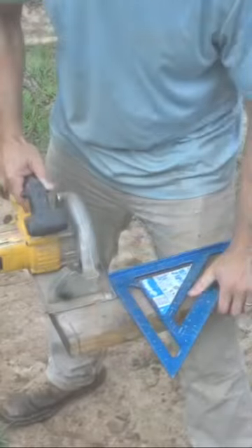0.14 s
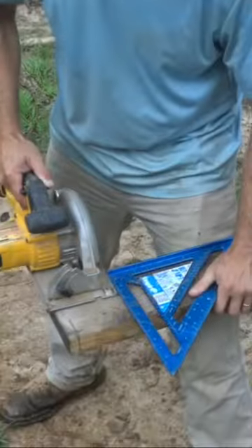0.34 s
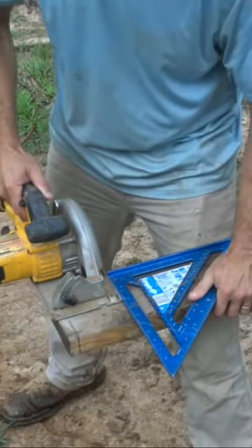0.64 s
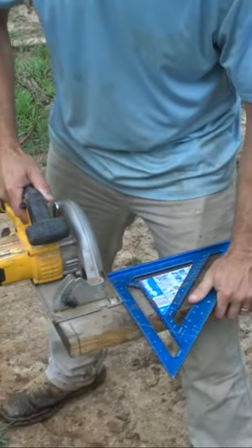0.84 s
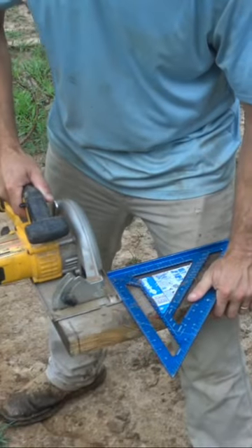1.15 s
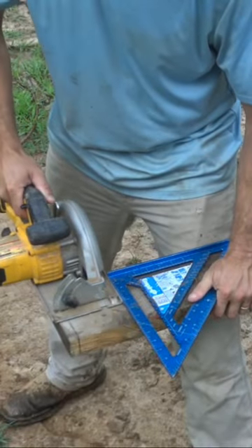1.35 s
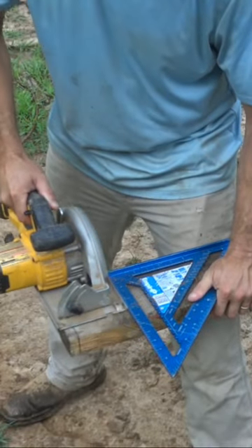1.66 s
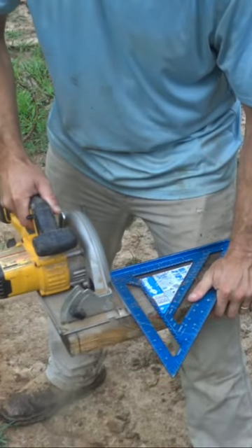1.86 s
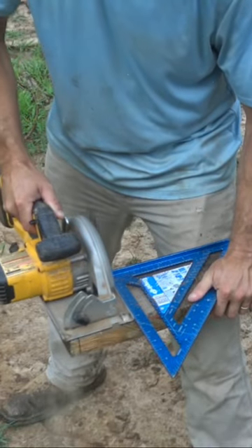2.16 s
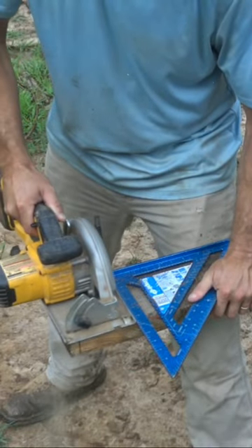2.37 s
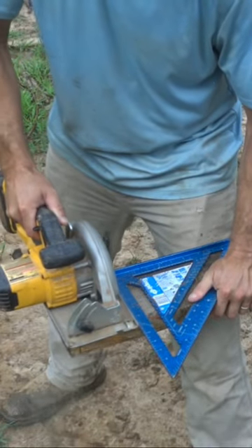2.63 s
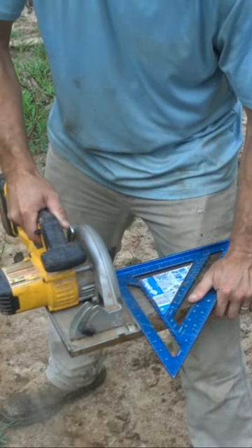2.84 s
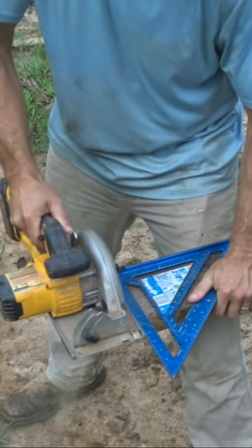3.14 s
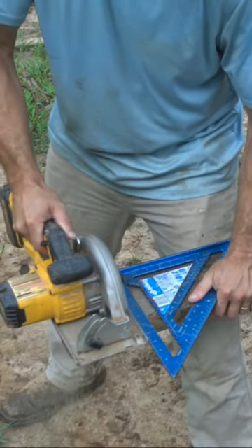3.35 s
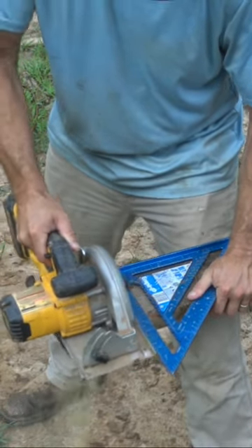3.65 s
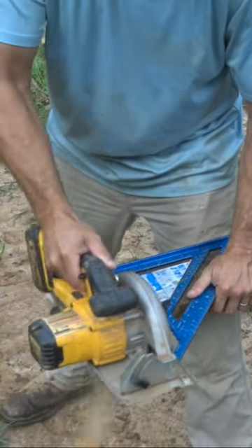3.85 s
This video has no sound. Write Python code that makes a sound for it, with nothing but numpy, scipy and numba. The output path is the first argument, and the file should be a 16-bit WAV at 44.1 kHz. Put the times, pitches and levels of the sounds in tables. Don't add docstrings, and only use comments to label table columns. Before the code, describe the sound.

Over a quiet insect hum outdoors, a close circular saw scuffs wood, its trigger snaps, its motor whines up into a loud gritty roar, labours, speeds up free, then clicks off with a sharp wooden knock.

```python
import sys
import numpy as np
from scipy import signal
from scipy.fft import rfft, irfft
from scipy.io import wavfile
from scipy.ndimage import uniform_filter1d, map_coordinates
from numba import njit

SR = 44100
rng = np.random.default_rng(int(sys.argv[2]) if len(sys.argv) > 2 else 0)


def voltage_ratio(decibels):
    exponent = np.asarray(decibels, float) / 20
    return 10 ** exponent


def unload_wav(signal):
    wavfile.write(
        sys.argv[1],
        SR,
        np.round(np.clip(np.atleast_2d(signal).T, -1, 1) * 32767).astype(np.int16),
    )


N = 176400
GEAR_TEETH, PINION_TEETH = 46, 9


def unit(x):
    return x / np.sqrt(np.mean(x ** 2))


def colour(x, table, share=1):
    hz, db = np.array(table, float).T
    f = np.maximum(np.fft.rfftfreq(N, 1 / SR), 1)
    gain_db = np.interp(np.log(f), np.log(np.maximum(hz, 1)), db)
    return irfft(rfft(x) * voltage_ratio(share * gain_db), N)


def band(x, hz, width):
    return signal.lfilter(*signal.iirpeak(hz, hz / width, SR), x)


def narrow(x, hz, width):
    return unit(band(band(x, hz, width), hz, width))


@njit
def sweep(x, hz, q):
    y, b, l = np.empty(len(x)), 0., 0.
    for i in range(len(x)):
        g = np.tan(np.pi * hz[i] / SR)
        v = (b + g * (x[i] - l)) / (1 + g * (g + 1 / q))
        b, l, y[i] = 2 * v - b, l + 2 * g * v, v
    return y


def butter(x, order, hz, kind):
    return signal.sosfilt(signal.butter(order, hz, kind, fs=SR, output="sos"), x)


def walk(rate):
    hold = int(SR / rate)
    steps = np.repeat(rng.standard_normal(N // hold + 1), hold)
    return 0.93 * uniform_filter1d(uniform_filter1d(steps, hold), hold)[:N]


def curves(table, t):
    at, *columns = np.array(table, float).T
    return (np.interp(t, at, c) for c in columns)


def bursts(events, source, t):
    out = 0
    for at, length, hz, width, db in events:
        swell = np.sin(np.pi * np.clip((t - at) / length, 0, 1)).clip(0)
        out = out + voltage_ratio(db) * swell * narrow(source, hz, width)
    return out


def hits(events, modes, rattle_s, soft_s):
    size, crack_db = 4096, 1.5
    out, t = np.zeros(N), np.arange(size) / SR
    ring = sum(voltage_ratio(g) * np.sin(2 * np.pi * hz * t) * 1000 ** (-t / t60) for hz, g, t60 in modes)
    for at, db in events:
        push = rng.standard_normal(size) * np.exp(-t / rattle_s)
        push = signal.lfilter([1], [1, -np.exp(-1 / (SR * soft_s))], push)
        blow = unit(signal.fftconvolve(push, ring)[:size]) + voltage_ratio(crack_db) * unit(push)
        i = int(at * SR)
        out[i:i + size] += (voltage_ratio(db) * blow / np.abs(blow).max())[:N - i]
    return out


def yard():
    # f/Hz, width/Hz, level/dB
    insects = [(4868, 400, -38), (6760, 1300, -63), (8340, 830, -63), (9670, 990, -60.5), (3250, 900, -91)]
    # t/s, length/s, f/Hz, width/Hz, level/dB
    flares = [(.733, 0.0091, 4930, 400, -32.5), (.982, .01, 4760, 400, -35), (1.061, .009, 4900, 500, -32)]
    # f/Hz, level/dB per Hz
    rumble = [(18, -47), (30, -32), (69, -0.5), (336, -5.5), (1100, -7), (1590, -15), (1730, -11.5),
              (3470, -15.5), (4000, -80.5), (5200, -49), (8800, -120)]
    left = np.array([[1], [-1]])

    def noise(wide):
        return rng.standard_normal(N) + wide * left * rng.standard_normal(N)

    wing_hz = 36 * (1 + 0.022 * walk(5.4))
    pulse = np.sin(2 * np.pi * np.cumsum(wing_hz) / SR)
    bugs = bursts(flares, noise(0), np.arange(N) / SR)
    for hz, width, db in insects:
        pulse_db = 0.3 * hz / 1000
        bugs = bugs + voltage_ratio(db) * narrow(noise(0.033) * voltage_ratio(1.2 * walk(88.2) + pulse_db * pulse), hz, width)
    pan_db = 5.5
    wind = voltage_ratio(-71) * narrow(noise(0.62), 63, 80)
    air = voltage_ratio(-61.5) * noise(0.073)
    return bugs * voltage_ratio(left * pan_db / 2) + voltage_ratio(-58.5) * unit(colour(noise(0.19), rumble)) + air + wind


def shoe_on_board(t):
    # t/s, peak level/dB
    taps = [(0.406, -37.5), (0.44, -32), (0.469, -39), (0.501, -35), (0.528, -41), (0.561, -44),
            (0.601, -39), (0.639, -37), (0.673, -38), (0.705, -40)]
    # f/Hz, level/dB, T60/s
    shoe = [(284, -14, .06), (612, 7, 0.057), (1000, -13, 0.027), (1520, 3, 0.044), (2030, -8, 0.087),
            (3200, -2, 0.048)]
    # t/s, length/s, f/Hz, width/Hz, level/dB
    scuffs = [(.58, .05, 2023, 80, -56), (.53, .13, 3150, 800, -57), (.855, .03, 3200, 400, -57),
              (.91, 0.067, 3050, 500, -63), (.98, .06, 2900, 500, -60), (1.04, .03, 2300, 900, -60),
              (1.068, 0.0082, 1690, 1400, -37), (1.075, 0.018, 1700, 1600, -45)]
    return hits(taps, shoe, 0.005, 0.00024) + bursts(scuffs, rng.standard_normal(N), t)


def trigger_clicks():
    # t/s, peak level/dB
    snaps = [
        (1.092, -7.5),
        (1.094, -12.5),
        (1.0985, -21),
        (1.1448, -8),
        (1.148, -5.5),
        (3.905, -4),
    ]
    # f/Hz, level/dB, T60/s
    trigger = [(970, -14, .015), (1400, -1, 0.032), (1790, 7, 0.026), (2760, 5.5, 0.009), (3580, 0, 0.0071),
               (5900, 5, 0.005), (8240, 7, 0.004), (11000, -4, 0.0025)]
    return butter(hits(snaps, trigger, 0.002, 0.00003), 2, [640, 10000], "band")


def board_knocks():
    # t/s, peak level/dB
    knocks = [
        (1.71, -37),
        (2.478, -39),
        (3.975, -11),
        (3.9772, -14),
        (3.98, -0.5),
    ]
    # f/Hz, level/dB, T60/s
    board = [(177, -20, 0.065), (310, -6, 0.049), (595, -8, 0.015), (820, 8, 0.034), (1140, 2, 0.024),
             (1600, -1, .015), (2940, -8, .006)]
    return butter(hits(knocks, board, 0.000276, 0.00014), 3, 90, "high")


def controller_chirp(t):
    start_s, length_s = 1.152, 0.079
    return voltage_ratio(-33.5) * np.sin(2 * np.pi * 3970 * t) * (t > start_s) * (t < start_s + length_s)


def tooth_contacts(turns, share):
    steps_per_turn, memory, chip_db = 640, 0.87, 1.5
    rows = rng.standard_normal((200, steps_per_turn))
    rows = signal.lfilter([1], [1, -memory], rows, axis=0)[9:].ravel()
    repeat = unit(map_coordinates(rows, [turns * steps_per_turn]))
    chips = unit(rng.standard_normal(N) * voltage_ratio(chip_db * rng.standard_normal(N)))
    return np.sqrt(share) * repeat + np.sqrt(1 - share) * chips


def gears(t, turns, grind):
    # t/s, gear mesh level/dB, its octave level/dB, motor shaft hum level/dB
    whine_levels = [(1.16, -40, -46, -60), (1.22, -23, -31, -55), (1.31, -19, -42, -46),
                    (1.385, -29, -26, -41), (1.52, -32, -30, -45), (1.7, -35, -38, -49),
                    (1.86, -32, -40, -50), (2.1, -40, -36, -55), (2.35, -29, -38, -49),
                    (2.75, -36, -38, -45), (3.05, -29, -30, -56), (3.18, -23, -25, -54),
                    (3.34, -31, -42, -52), (3.47, -19, -29, -52), (3.58, -42, -36, -52),
                    (3.68, -26, -42, -45), (3.85, -36, -34, -41), (3.92, -19, -33, -56)]
    # multiple of the shaft rate, level/dB re hum
    shaft_tones = [(1, 0), (3, 6)]
    housing_hz = [900, 1250, 1720, 2150, 2330, 2560, 3090]
    mesh_db, octave_db, hum_db = curves(whine_levels, t)
    shaft = 2 * np.pi * turns * GEAR_TEETH / PINION_TEETH

    def tone(k, db):
        level = voltage_ratio(db + 2 * walk(22) + 2.5 * grind * walk(130))
        return level * np.sin(k * shaft + (0.2 + 1.4 * grind) * walk(250))

    wobble = 1 + 0.12 * np.sin(2 * np.pi * turns) + 0.24 * np.sin(shaft)
    mesh = wobble * tone(PINION_TEETH, mesh_db + 3.5)
    housing = sum(band(mesh, hz, 160) for hz in housing_hz)
    octave = wobble * tone(2 * PINION_TEETH, octave_db + 2.0)
    hum = sum(tone(k, hum_db + db + 5.0) for k, db in shaft_tones)
    return voltage_ratio(-4) * mesh + voltage_ratio(-4) * housing + octave + hum


def blade_song(t, turns):
    # t/s, length/s, multiple of the blade turn, level/dB
    songs = [(1.5, .25, 3, -54), (1.9, .25, 104, -29), (2.25, .2, 74, -28), (2.38, .14, 72, -26),
             (2.45, .4, 78, -23), (2.57, .22, 70, -33), (2.78, .38, 3, -52), (3.2, .25, 6, -44),
             (3.3, .1, 40, -24), (3.36, .09, 80, -28), (3.81, .11, 15.33, -25), (3.86, .04, 40.9, -25),
             (3.81, .12, 89, -29), (3.49, .06, 46, -24), (3.5, .09, 92, -26)]
    out = 0
    for at, length, k, db in songs:
        swell = np.sqrt(np.sin(np.pi * np.clip((t - at) / length, 0, 1)).clip(0))
        out = out + voltage_ratio(db + 3 + 1.2 * walk(25)) * swell * np.sin(2 * np.pi * k * turns + 0.2 * walk(150))
    return out


def cutting(t, contacts, rasp_db, roar_db, fizz_db):
    # f/Hz, width/Hz, level/dB
    blade_rings = [(930, 110, 3), (1700, 200, -2), (6800, 200, -6), (8740, 250, -6), (11450, 400, -6)]
    # t/s, f/Hz, level/dB re rasp
    kerf = [(1.4, 6600, -4), (1.6, 7360, -6), (2.1, 5700, -6.5), (2.5, 5300, -6.5), (3.0, 4040, -8),
            (3.35, 2010, -4.5), (3.6, 2360, -10), (3.8, 3470, -10.5)]
    # f/Hz, level/dB per Hz
    rasp_shape = [(1500, -34), (2500, -24), (3200, -5), (4500, -2.5), (6000, 3), (9000, 0.5), (12000, -8.5),
                  (15600, -27)]
    # f/Hz, level/dB per Hz
    roar_shape = [(59, -73), (100, -23), (304, -22.5), (780, -21.5), (895, -5.5), (1580, -3), (1910, -5.5),
                  (2480, -5.5), (4000, -12), (5200, -17), (8800, -120)]
    # f/Hz, level/dB per Hz
    fizz_shape = [(8000, -22), (10500, -1.5), (12500, -0.5), (14500, -4), (15700, -6.5)]
    rings = 0
    for hz, width, db in blade_rings:
        rings = rings + voltage_ratio(db + 2.1 * walk(3.99)) * band(contacts, hz, width) * np.sqrt(hz / width)
    teeth = contacts + voltage_ratio(-13) * unit(rings)
    kerf_hz, kerf_db = curves(kerf, t)
    slot = unit(sweep(contacts, kerf_hz, 4.0))
    rasp = unit(colour(teeth, rasp_shape)) + voltage_ratio(kerf_db) * slot
    roar = unit(colour(teeth, roar_shape))
    fizz = unit(colour(teeth, fizz_shape))
    return (rasp * voltage_ratio(rasp_db - 4.0 + 0.11 * walk(18)) + roar * voltage_ratio(roar_db + walk(9.63))
            + fizz * voltage_ratio(fizz_db + 0.27 * walk(10.1)))


def saw(t):
    # t/s, gear mesh f/Hz
    speed = [(1.15, 300), (1.36, 2658), (1.44, 3309), (1.52, 3465), (1.63, 3402), (1.81, 3124),
             (1.99, 3004), (2.23, 2997), (2.35, 3108), (2.59, 3009), (2.77, 2986), (3.07, 2734),
             (3.25, 2314), (3.49, 2562), (3.58, 2600), (3.76, 3400), (3.9, 3680), (4.0, 1050)]
    # t/s, rasp level/dB, board roar level/dB, fizz level/dB, share repeating each turn/0-1
    effort = [(1.16, -35, -29.5, -56, 0.3), (1.22, -26, -25, -38, 0.05), (1.3, -18.5, -19, -32, 0.27),
              (1.42, -20, -21, -21, 0.34), (1.6, -17, -27, -20.5, 0.78), (2.1, -18, -24.5, -21.5, 0.7),
              (2.9, -16, -25, -24, 0.89), (3.2, -16.5, -23.5, -24.5, 0.55), (3.36, -15.5, -20.5, -29, 0.65),
              (3.6, -15, -20.5, -29, 0.4), (3.8, -13, -22.5, -26.5, 0.32), (3.9, -17.5, -19.5, -63, 0.03),
              (4.0, -34, -28, -40, 0.2)]
    # t/s, length/s, f/Hz, width/Hz, level/dB
    jolts = [(1.21, .03, 2200, 540, -26), (1.28, 0.021, 5000, 270, -24), (1.4, 0.042, 1540, 150, -23),
             (1.335, 0.021, 3100, 600, -20), (1.6, 0.051, 1500, 120, -27), (1.25, 0.036, 510, 110, -33),
             (2.84, .1, 5600, 280, -24), (3.535, 0.041, 1560, 200, -20.5), (3.55, 0.043, 2000, 290, -25),
             (3.59, 0.038, 4400, 460, -26.5), (3.595, 0.023, 3100, 2500, -21),
             (3.59, 0.082, 920, 170, -26.5), (3.4, .03, 4900, 1100, -18), (3.8, 0.03, 11300, 500, -28),
             (2.9, .06, 8800, 300, -23)]
    start_s = speed[0][0]
    mesh_hz = np.interp(t, *np.array(speed).T)
    turns = np.cumsum(mesh_hz * (t > start_s)) / SR / GEAR_TEETH
    grind = np.clip(0.09 * np.abs(np.gradient(mesh_hz)) * SR / 1000, 0, 1)
    rasp_db, roar_db, fizz_db, share = curves(effort, t)
    contacts = tooth_contacts(turns, np.clip(share, 0, 1))
    guard = voltage_ratio(roar_db - 15.5) * grind * unit(band(contacts, 542, 125))
    running = (cutting(t, contacts, rasp_db, roar_db, fizz_db) + gears(t, turns, grind)
               + blade_song(t, turns) + bursts(jolts, contacts, t) + guard)
    return running * np.clip((t - start_s) / 0.012, 0, 1) + controller_chirp(t)


def scene():
    # f/Hz, level/dB
    saw_pan = [(150, 1.9), (700, 4.6), (1500, 6.2), (4000, 0.24), (15000, 0.11)]
    # f/Hz, level/dB
    wide_shape = [(100, 14), (300, 5), (1000, 0), (2400, 4), (4400, 3), (8000, 9), (15000, 11)]
    t = np.arange(N) / SR
    clicks = trigger_clicks()
    tool = butter(saw(t) + shoe_on_board(t) + voltage_ratio(-5.5) * clicks, 2, 257, "high")
    tool = tool + board_knocks()
    echo_t60_s = 0.097
    tails = rng.standard_normal((2, 6000)) * 1000 ** (-t[:6000] / echo_t60_s)
    echo, wide = (signal.fftconvolve(tool, h / np.linalg.norm(h))[:N] for h in tails)
    tool = tool + voltage_ratio(-7) * echo + clicks
    wide = voltage_ratio(-27) * colour(wide, wide_shape)
    return np.array([colour(tool, saw_pan, 0.13) + wide, colour(tool, saw_pan, -0.39) - wide]) + yard()


def roll_off(x):
    return signal.sosfilt(signal.butter(12, 15800, fs=SR, output="sos"), x)


def record(dry):
    start_s, fade_s, top_hz = 0.034, 0.0022, 15800
    gate = np.clip((np.arange(N) / SR - start_s) / fade_s, 0, 1)
    rounded = np.tanh(dry * gate)
    mix = signal.sosfilt(signal.ellip(8, 0.2, 50, top_hz, fs=SR, output="sos"), rounded)
    return roll_off(mix)


dry = scene()
out = record(dry)
unload_wav(out)
```